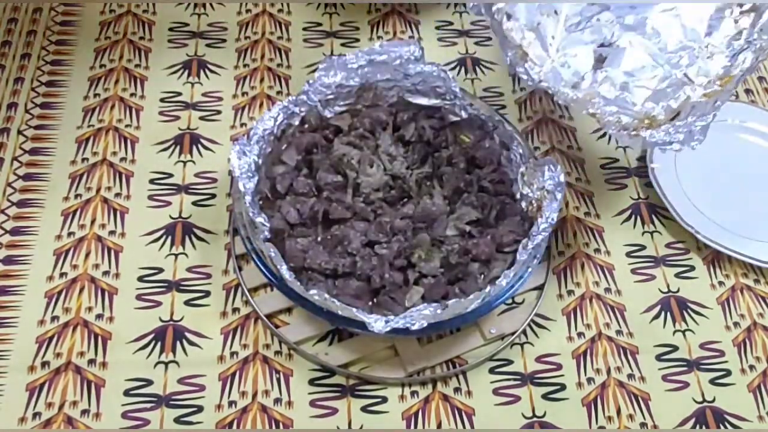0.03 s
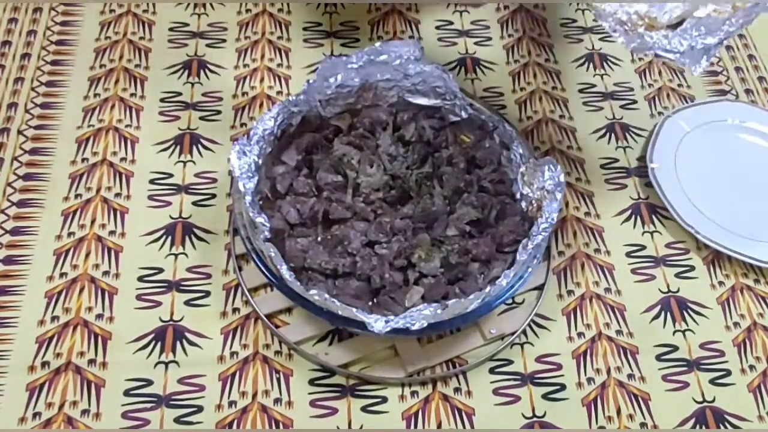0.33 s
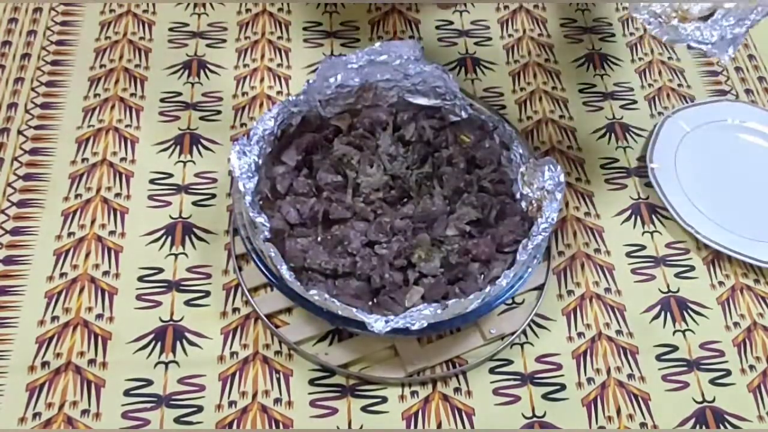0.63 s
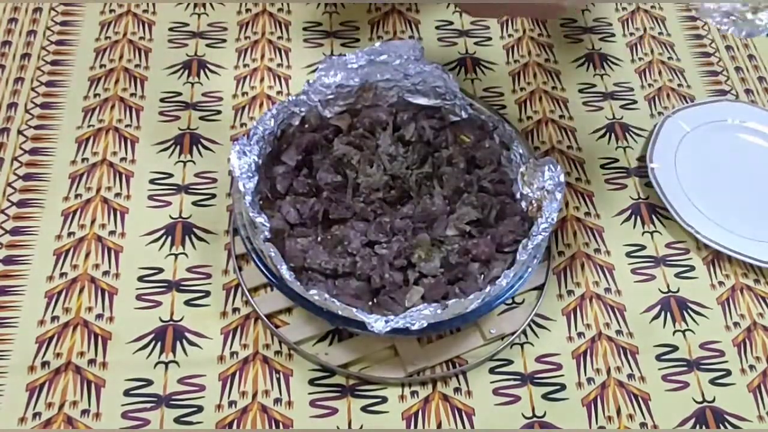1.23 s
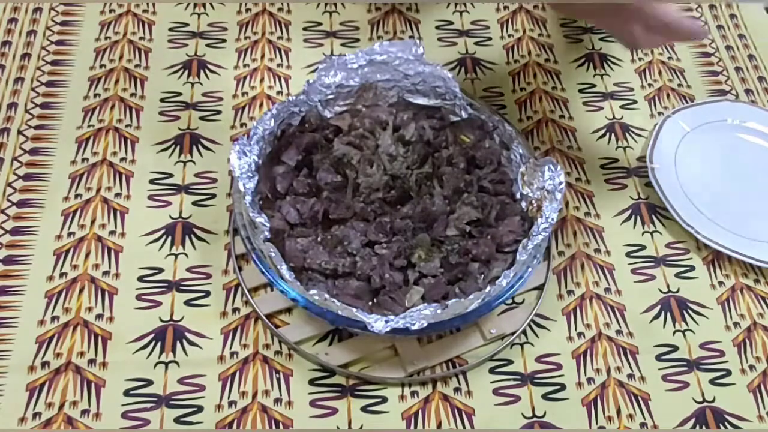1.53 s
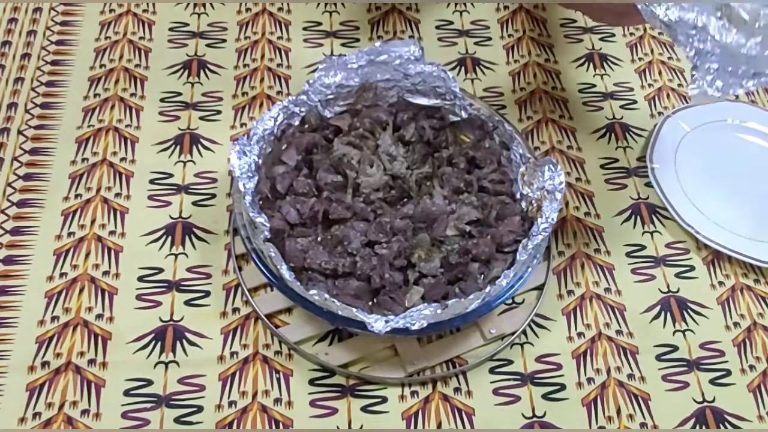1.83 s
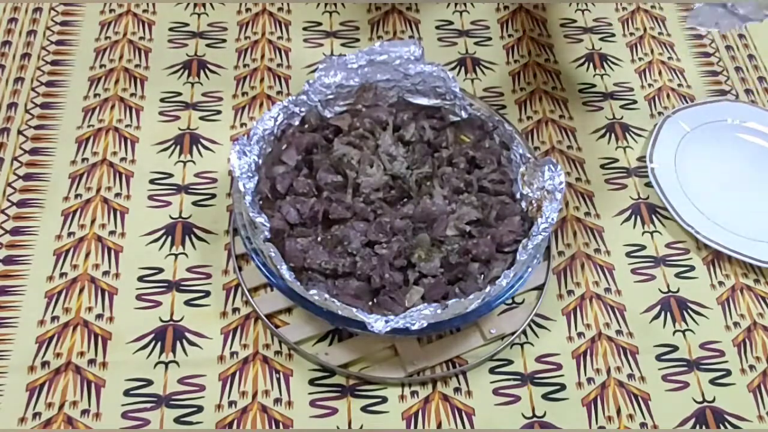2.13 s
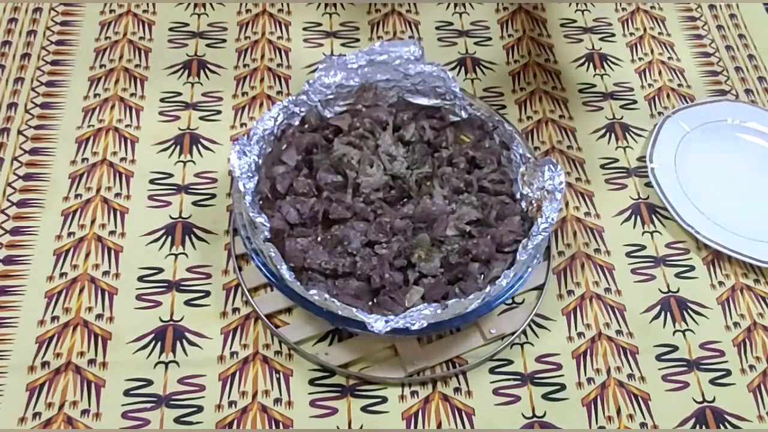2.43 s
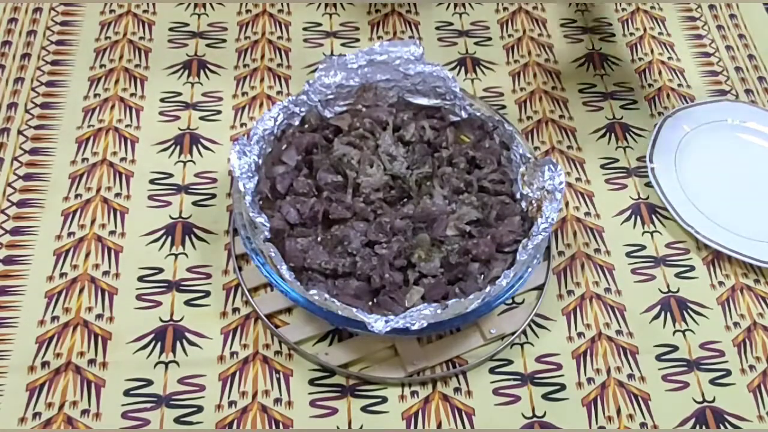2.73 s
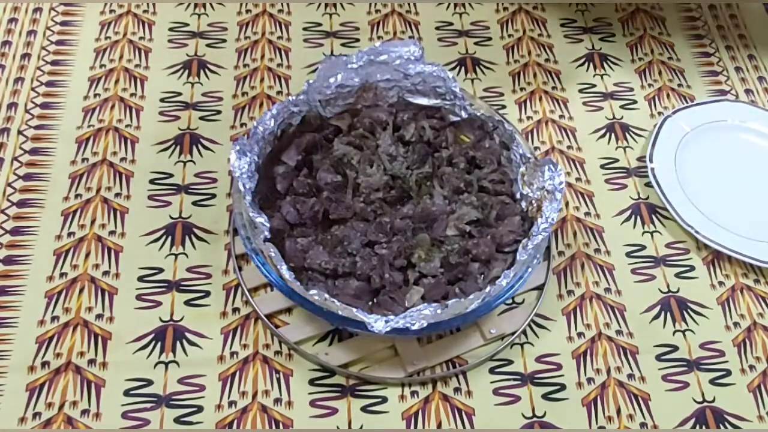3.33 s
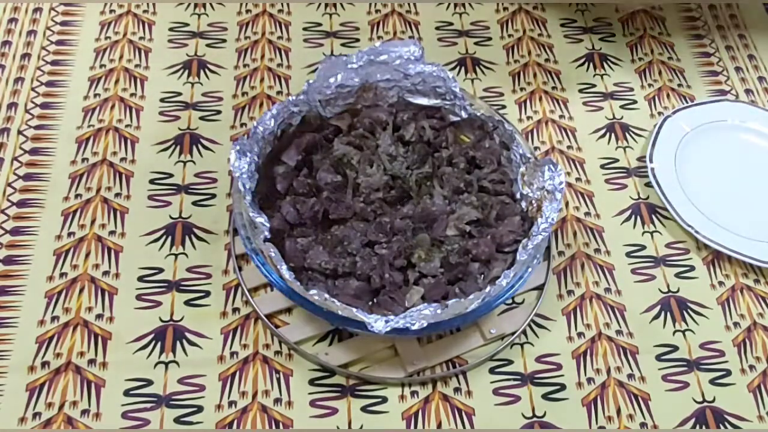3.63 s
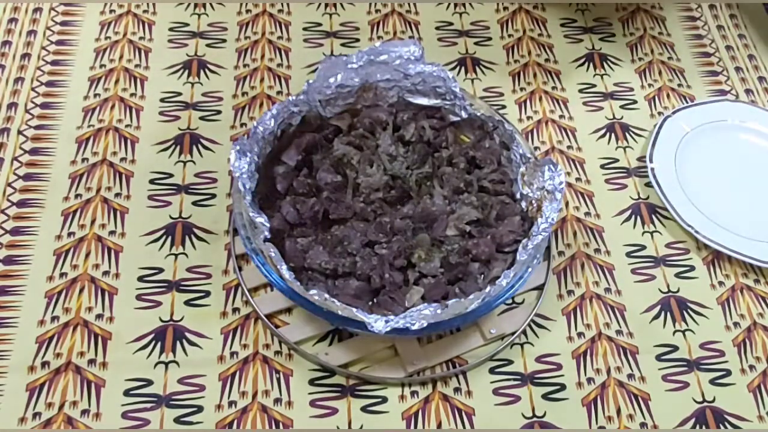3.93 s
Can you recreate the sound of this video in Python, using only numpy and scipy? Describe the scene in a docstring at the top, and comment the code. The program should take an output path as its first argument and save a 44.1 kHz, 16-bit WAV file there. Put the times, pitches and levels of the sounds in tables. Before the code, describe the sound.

Close by and right of centre, aluminium foil crinkles and snaps as someone handles it in a small, faintly humming kitchen. From halfway, things thud softly on a covered table, and one bright, ringing dish clink comes at the end.

```python
"""A dense crackle with louder snaps: aluminium foil crumpled by hand in a small kitchen.
Each buckling crease ticks and rings a small facet of the sheet. From about 2.2 s things bump
and knock on a cloth-covered table; near the end a china baking dish clinks and its modes ring.
Behind it all, two motors hum and beat against each other over a faint whine and room air."""
import sys
import numpy as np
from scipy import signal
from scipy.fft import rfft, irfft
from scipy.io import wavfile

SR = 44100
rng = np.random.default_rng(int(sys.argv[2]) if len(sys.argv) > 2 else 0)


def output_pcm(signal):
    """Save a mono or channel-first signal as 16-bit PCM at the path in sys.argv[1].

    Samples are clipped to [-1, 1] before scaling.
    """
    pcm = np.clip(np.atleast_2d(signal).T, -1, 1) * 32767
    wavfile.write(sys.argv[1], SR, np.round(pcm).astype(np.int16))


N = 176400
T = np.arange(N) / SR
HZ = np.maximum(np.fft.rfftfreq(N, 1 / SR), 1)

# folds giving way: (time [s], relative level [dB])
SNAPS = [(0.117, -31), (0.495, -26), (0.560, -31), (0.570, -29), (0.669, -23), (0.695, -25), (0.784, -24),
         (0.893, -24), (0.949, -20.5), (0.961, -15.5), (0.971, -19), (1.007, -23), (1.033, -22),
         (1.050, -24), (1.070, -20.5), (1.079, -21), (1.180, -26), (1.201, -19), (1.301, -21), (1.387, -23),
         (1.407, -23), (1.523, -21), (1.534, -21), (1.579, -19), (1.650, -19.5), (1.674, -21),
         (1.800, -21.5), (1.848, -24), (1.907, -19.5), (2.151, -20), (2.187, -20), (2.283, -20),
         (2.536, -22), (2.604, -25), (2.678, -23), (2.745, -14), (2.802, -29), (2.854, -26.5), (2.951, -21),
         (3.038, -23), (3.066, -23), (3.236, -30)]


def foil(facets=16, glide_hz=450, wander_db=3, lag_samples=8, pan_db=-8, room_db=-1.5):
    """Creases and snaps ring facets; pitches glide as the sheet bends. The right side hears it first."""
    # foil spectrum: (frequency [Hz], relative density [dB])
    spectrum = [(150, -9.5), (400, 5.5), (800, 0), (1400, 4), (2600, 3), (4500, -1), (8000, -6),
                (12000, -4), (15500, -6.5)]
    # foil midrange: (time [s], gain [dB])
    midrange = [(0, 1), (.5, -4.5), (.8, 0), (1.0, -3.5), (1.6, -5), (1.85, -1.5), (2.15, 2), (2.4, -2),
                (2.7, -1.5), (3.05, -3.5), (3.5, 0.5)]
    ticks = creases()
    facet_of_tick = rng.integers(0, facets, N)
    folds = snaps()
    sheet = np.array([np.roll(folds, lag_samples), folds])
    for k, hz in enumerate(np.linspace(2400, 15500, facets)):
        pitch_hz = np.abs(hz + glide_hz * drift(hz=12))
        facet = facet_rings(ticks * (facet_of_tick == k), pitch_hz) * from_db(wander_db * drift(hz=14))
        sheet += np.array([np.roll(facet, lag_samples + rng.integers(-3, 4)), facet])
    mids = signal.lfilter(*signal.butter(1, 3500, fs=SR), sheet)
    mid_gain = from_db(np.interp(T, *np.transpose(midrange)))
    direct = colour(sheet + mids * (mid_gain - 1), spectrum)
    return direct * pan(pan_db) + from_db(room_db) * shifting_room(direct) * pan(pan_db / 2)


def creases(usual_per_s=2000, usual_db=-43.5, trim_db=-1, spread_db=-17.5, flurry_db=1.8):
    """Tiny buckles come in flurries, faster and stronger with effort; buckling spreads from each snap."""
    # hand effort on the foil: (time [s], level [dB])
    crumple = [(0, -43), (.04, -79), (.18, -73), (.26, -66), (.31, -90), (.39, -67), (.42, -51), (.49, -45),
               (.535, -64), (.57, -57.5), (.64, -50), (.68, -44.5), (.74, -48), (.775, -61), (.8, -42.5),
               (.94, -47.5), (.965, -42), (1.0, -51), (1.07, -57), (1.1, -65), (1.16, -57), (1.19, -33),
               (1.235, -60), (1.27, -40.5), (1.37, -45.5), (1.41, -37), (1.49, -44), (1.53, -39),
               (1.62, -46), (1.68, -39.5), (1.77, -54.5), (1.82, -41), (1.91, -36), (1.97, -43.5),
               (2.12, -39.5), (2.17, -38), (2.28, -43.5), (2.33, -48), (2.43, -41), (2.52, -60),
               (2.56, -46.5), (2.62, -48.5), (2.68, -40), (2.75, -43), (2.83, -61), (2.88, -45.5),
               (3.02, -60.5), (3.07, -38), (3.14, -66.5), (3.22, -55.5), (3.28, -48), (3.34, -58),
               (3.42, -43.5), (3.48, -51), (3.61, -50), (3.67, -67), (3.87, -56.5)]
    power = from_db(np.interp(T, *np.transpose(crumple)) + trim_db) ** 2
    power += sum((from_db(db + spread_db) * decay(start_s, t60_s=.052)) ** 2 for start_s, db in SNAPS)
    effort_db = 10 * np.log10(power) + flurry_db * drift(hz=60)
    chance = usual_per_s * from_db(.25 * (effort_db - usual_db)) / SR
    size_db = 2 * np.minimum(rng.exponential(1, N), np.pi)
    sizes = unit_rms(from_db(size_db)) * rng.choice([-1, 1], N)
    return (rng.random(N) < chance) * sizes / np.sqrt(chance) * from_db(effort_db)


def snaps(count=10, run_s=.004, trim_db=-1.2, fade_db=5, highpass_hz=3000):
    """Each fold gives way in a short run of thin clicks and rings a stiff facet of its own pitch."""
    clicks, pitch_hz = np.zeros(N), np.zeros(N)
    for start_s, db in SNAPS:
        jitter = rng.random(count) * (np.arange(count) > 0)
        progress = (np.arange(count) + jitter) / count
        at = ((start_s + run_s * progress) * SR).astype(int)
        clicks[at] += from_db(db + trim_db - fade_db * progress) * rng.choice([-1, 1], count)
        pitch_hz[at] = rng.uniform(8900, 15500)
    return signal.lfilter(*signal.butter(1, highpass_hz, "high", fs=SR), facet_rings(clicks, pitch_hz))


def facet_rings(clicks, pitch_hz, tau_s=.0004, ring_share=.42, ring_samples=256):
    """Part of each click's energy rings briefly at the facet's pitch of that moment."""
    at, age = np.flatnonzero(clicks)[:, None], np.arange(ring_samples)
    rings = np.exp(-age / SR / tau_s) * np.cos(2 * np.pi * pitch_hz[at] * age / SR)
    rings = rings * clicks[at] / np.linalg.norm(rings, axis=1, keepdims=True)
    ringing = np.bincount((at + age).ravel(), rings.ravel(), N + ring_samples)[:N]
    return np.sqrt(1 - ring_share) * clicks + np.sqrt(ring_share) * ringing


def dish(crack_db=-5.5, rattle_db=-17.5, flutter_db=2.5, room_db=-6):
    """Touches ring the china, the hard contact with a crack; its modes flutter as it settles."""
    # touches on the dish: (time [s], relative level [dB])
    clinks = [(3.76, -39), (3.827, -32), (3.879, -8), (3.8855, 2)]
    # first hard contact: (frequency [Hz], relative density [dB])
    crack_spectrum = [(500, -10), (3000, -12), (7000, -5), (10300, 10), (13000, 9.5), (15200, 0.5)]
    # dense upper modes and rattle: (frequency [Hz], relative density [dB])
    rattle_spectrum = [(300, 2), (1100, 3), (1600, 4), (2500, 3), (4400, 9.5), (5350, -7.5), (5850, 15),
                       (6450, -22), (7000, 7), (8300, -18), (9400, 5), (10800, -15), (12500, -3),
                       (13700, -23), (15200, -23)]
    # dish modes: (frequency [Hz])
    modes_hz = [1443, 1469, 1580, 1722, 2204, 2232, 2764, 3175, 3197, 3897, 4056, 4115, 4340, 4411, 4465,
                5790, 5822, 6075, 6857, 7070, 7108, 7640, 9326, 10462, 11250, 11670, 12047, 12190, 12513,
                12750, 15081]
    # strength of each mode: (relative level [dB])
    modes_db = [-28, -25, -32, -23, -26, -25, -26, -24, -24, -26, -21, -22, -23, -23, -20, -25, -23, -24,
                -26, -25, -20, -31, -29, -28, -26, -23, -25, -25, -22, -24, -26]
    crack = from_db(crack_db) * decay(start_s=3.878, t60_s=.042) * rng.standard_normal((2, N))
    china = colour(crack, crack_spectrum)
    for hz, mode_db in zip(modes_hz, modes_db):
        t60_s = .5 * (hz / 1000) ** -.6
        power = sum((from_db(db + mode_db) * decay(start_s, t60_s, attack_s=.002)) ** 2
                    for start_s, db in clinks)
        flutter = unit_rms(from_db(flutter_db * drift(hz=160)))
        phase = 2 * np.pi * (hz * T + rng.random())
        side_phase = np.array([[0], [np.pi / 2]]) * rng.choice([-1, 1])
        china += np.sqrt(power) * flutter * np.sin(phase + side_phase)
    rattle = sum(from_db(db + rattle_db) * decay(start_s, t60_s=.2) for start_s, db in clinks)
    china += colour(rattle * rng.standard_normal((2, N)), rattle_spectrum)
    return (china + from_db(room_db) * kitchen(china)) * pan(db=-4)


def table_bumps(broadband_db=-25.5):
    """Padded blows shake the table; something hollow is set down on it."""
    # blows: (time [s], level [dB], high-pass [Hz], low-pass [Hz], t60 [s])
    bumps = [(2.168, -20, 168, 400, 0.37), (2.179, -17, 45, 603, 0.34), (2.195, -15.5, 142, 253, 0.35),
             (3.263, -27.5, 119, 180, 0.27), (3.31, -35, 90, 150, 0.87), (3.759, -27, 300, 1380, 0.38),
             (3.787, -26, 79.6, 101, 0.44), (3.808, -25, 89, 149, 0.26)]
    # table resonances: (frequency [Hz], width [Hz], gain [dB])
    table_modes = [(62.4, 44, 2.5), (130.3, 16.2, 8), (168, 27, 2.5), (232.5, 26, 0), (292, 16.2, 7),
                   (504, 59, -6), (728, 160, -12.5), (1740, 320, -12)]
    # hollow object's resonances: (frequency [Hz], width [Hz], gain [dB])
    hollow_modes = [(302, 43, -0.5), (455, 41, -0.5), (583, 21, -0.5), (870, 260, -12.5),
                    (1560, 1160, -21.5)]
    shake = stereo_noise()
    body = from_db(broadband_db) * shake + resonator_bank(shake, table_modes)
    thuds = blow(resonator_bank(shake, hollow_modes), start_s=3.395, db=-18.5, t60_s=.23, attack_s=.009)
    for start_s, db, highpass_hz, lowpass_hz, t60_s in bumps:
        shifted = np.roll(body, rng.integers(N), axis=1)
        trimmed = signal.sosfilt(signal.butter(2, highpass_hz, "high", fs=SR, output="sos"), shifted)
        padded = signal.lfilter(*signal.butter(1, lowpass_hz, fs=SR), trimmed)
        thuds += blow(padded, start_s, db, t60_s)
    return thuds * pan(db=-3.5)


def blow(shake, start_s, db, t60_s, attack_s=.0015):
    """Shaking that starts at an impact and dies away."""
    envelope = decay(start_s, t60_s, attack_s)
    return from_db(db) * unit_rms(shake * envelope) * np.sqrt(np.mean(envelope ** 2))


def shifting_room(x, places=7, places_per_s=6):
    """The sheet turns in the hands, so its pattern of reflections keeps changing."""
    distances = [np.abs((T * places_per_s - k) % places - places / 2) for k in range(places)]
    return sum(kitchen(x * np.cos(np.pi / 2 * np.minimum(d, 1))) for d in distances)


def kitchen(x):
    """Diffuse reflections of a small room, different on each side."""
    envelope = decay(start_s=.00066, t60_s=.22, attack_s=.00028)
    tail = (rng.standard_normal((2, N)) * envelope)[:, :SR // 2]
    tail /= np.sqrt(np.sum(tail ** 2, 1, keepdims=True))
    return signal.fftconvolve(np.atleast_2d(x), tail, axes=1)[:, :N]


def motors(hum_hz=94.4, beat_hz=7.37, crest_s=.07):
    """Two motors close in pitch beat; the louder one wavers. A faint whine lies above."""
    rad_per_hz = 2 * np.pi * (T - crest_s)
    first = from_db(-31.5) * (1 + .092 * drift(hz=14)) * np.sin(hum_hz * rad_per_hz)
    second = from_db(-43) * np.sin((hum_hz + beat_hz) * rad_per_hz)
    whine = from_db(-57) * unit_rms(resonate(stereo_noise(), hz=767.2, width_hz=15.4))
    return first + second + whine


def room_air(db=-44):
    """Steady low rush of the room."""
    # air spectrum: (frequency [Hz], relative density [dB])
    spectrum = [(25, -14.5), (60, 1), (130, 1), (190, -5), (290, -0.5), (380, -8.5), (650, -15),
                (1100, -15.5), (2000, -28.5), (3500, -38), (9000, -40.5), (16000, -59)]
    return from_db(db) * colour(stereo_noise(), spectrum)


def stereo_noise():
    """White noise, alike on both sides in the bass and top treble, unrelated near 1.2 kHz."""
    # left-right likeness: (frequency [Hz], correlation [0..1])
    likeness = [(60, 0.83), (200, 0.84), (500, 0.69), (1200, 0), (16000, 0.84)]
    alike = over_log_hz(likeness)
    mid, side = rfft(rng.standard_normal((2, N)))
    return irfft(np.sqrt((1 + alike) / 2) * mid + np.sqrt((1 - alike) / 2) * side * [[1], [-1]], N)


def resonator_bank(x, modes):
    """Parallel resonances of alternating sign."""
    return sum((-1) ** k * from_db(db) * resonate(x, hz, width_hz)
               for k, (hz, width_hz, db) in enumerate(modes))


def resonate(x, hz, width_hz):
    """Two-pole resonance, unit peak gain."""
    radius = np.exp(-np.pi * width_hz / SR)
    feedforward = np.array([1, 0, -1]) * (1 - radius ** 2) / 2
    feedback = [1, -2 * radius * np.cos(2 * np.pi * hz / SR), radius ** 2]
    return signal.lfilter(feedforward, feedback, x + 1e-18)


def colour(x, spectrum):
    """Minimum-phase filter; white noise keeps its power."""
    cepstrum = irfft(np.log(unit_rms(from_db(over_log_hz(spectrum)))), N)
    cepstrum[1:N // 2] *= 2
    cepstrum[N // 2 + 1:] = 0
    response = irfft(np.exp(rfft(cepstrum)), N)[:4096]
    return signal.fftconvolve(np.atleast_2d(x), response[None])[:, :N]


def over_log_hz(points):
    """Breakpoints interpolated over log frequency."""
    hz, value = np.transpose(points)
    return np.interp(np.log(HZ), np.log(hz), value)


def decay(start_s, t60_s, attack_s=1e-4):
    """Envelope: quick rise, exponential fall."""
    age_s = np.maximum(T - start_s, 0)
    return (1 - np.exp(-age_s / attack_s)) * from_db(np.maximum(-60 * age_s / t60_s, -200))


def drift(hz):
    """Unit-RMS random wander, mostly below hz."""
    return unit_rms(irfft(rfft(rng.standard_normal(N)) / (1 + (HZ / hz) ** 2), N))


def pan(db):
    """Stereo gains; db is left minus right."""
    return from_db(np.array([[db], [-db]]) / 2)


def unit_rms(x):
    """Scale to unit power."""
    return x / np.sqrt(np.mean(x ** 2) + 1e-20)


def from_db(db):
    """Decibels to gain."""
    return 10 ** (np.asarray(db) / 20)


def scene():
    """Foil, table, dish and background, all right of centre."""
    return foil() + table_bumps() + dish() + (motors() + room_air()) * pan(db=-4)


def record(dry):
    """Clip at full scale, then low-pass steeply at 16 kHz."""
    lowpass = signal.ellip(10, .1, 80, 16000, fs=SR, output="sos")
    return signal.sosfilt(lowpass, np.clip(dry, -1, 1))


dry = scene()
out = record(dry)
output_pcm(out)
```